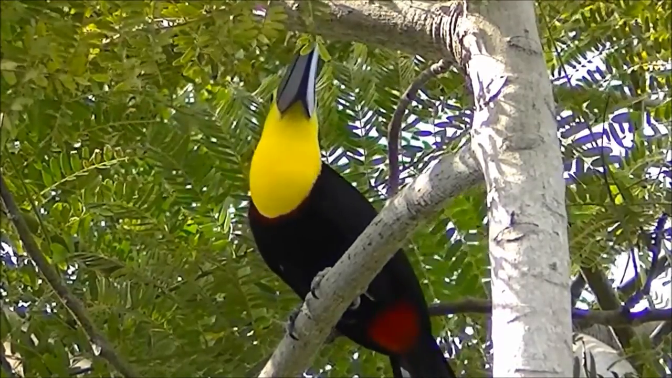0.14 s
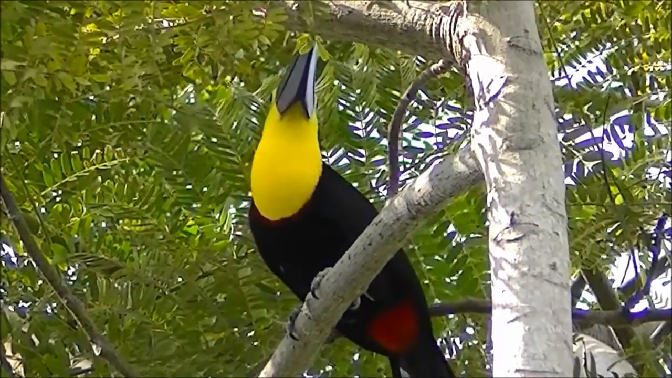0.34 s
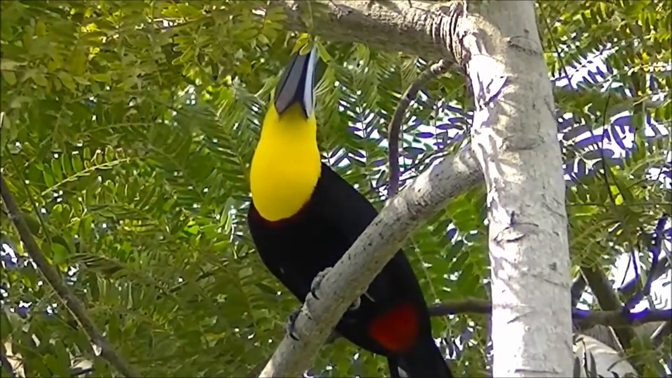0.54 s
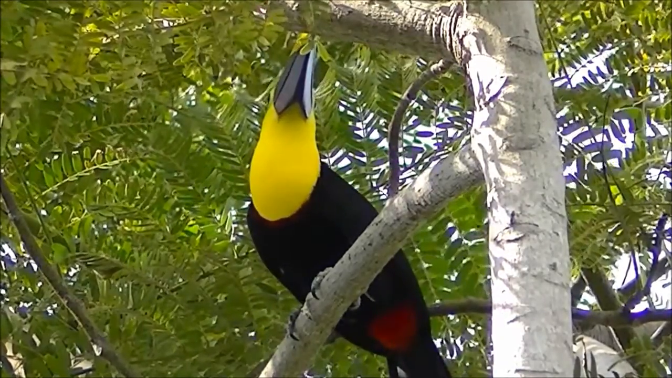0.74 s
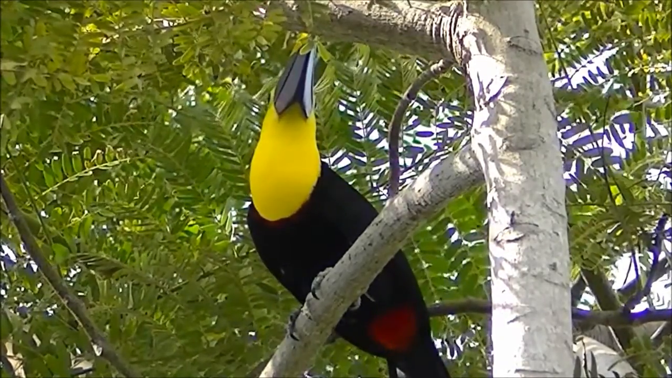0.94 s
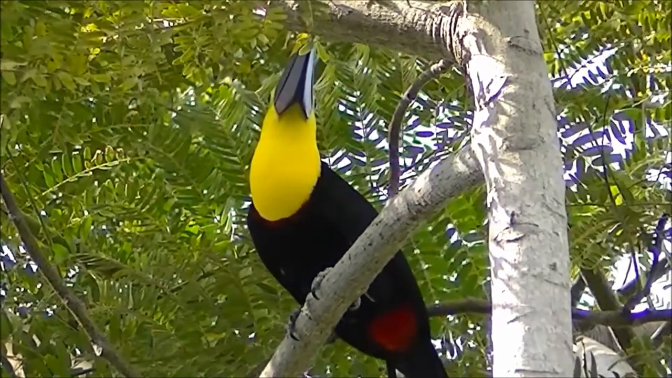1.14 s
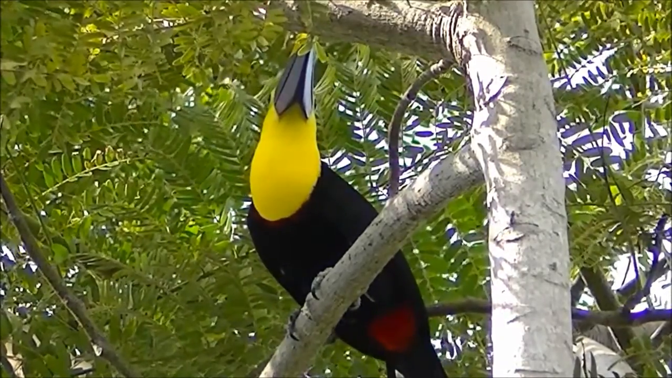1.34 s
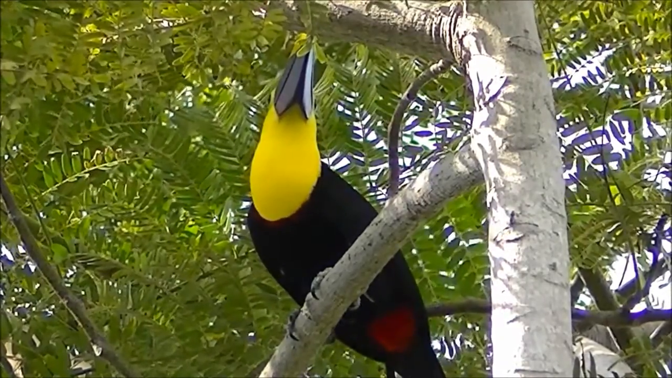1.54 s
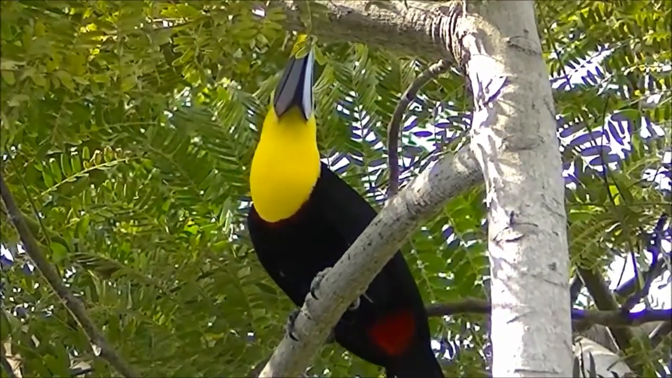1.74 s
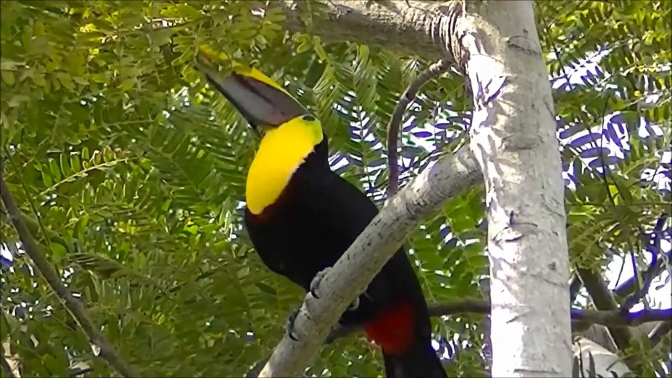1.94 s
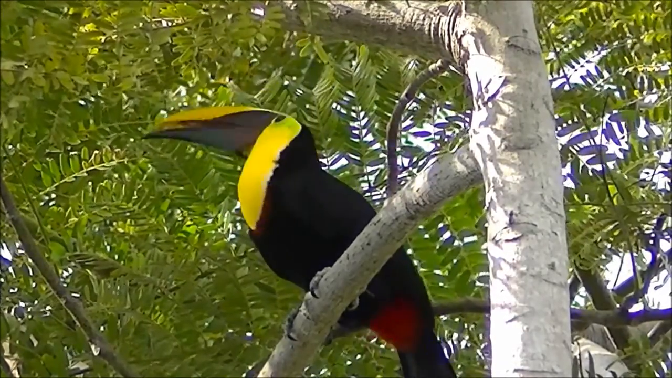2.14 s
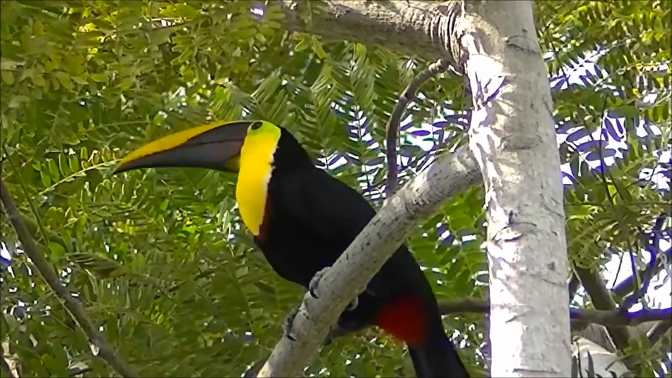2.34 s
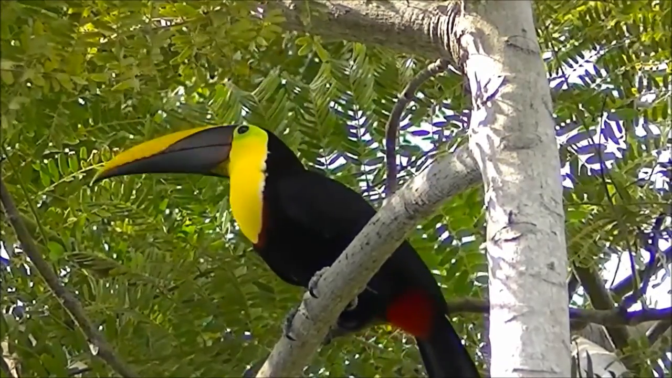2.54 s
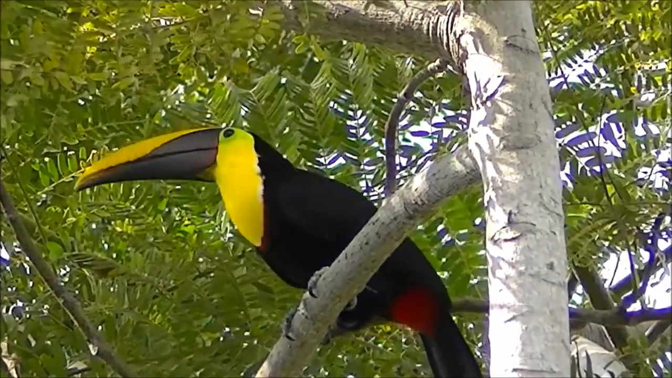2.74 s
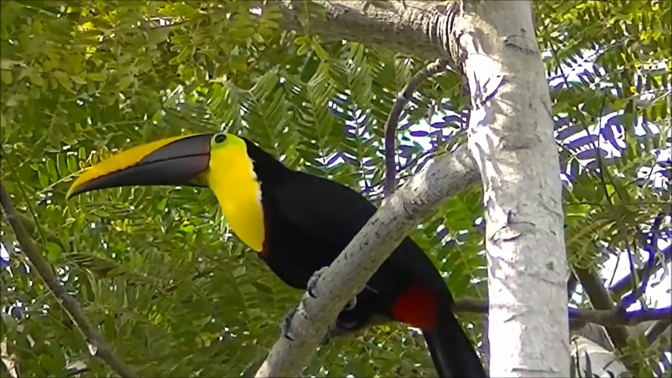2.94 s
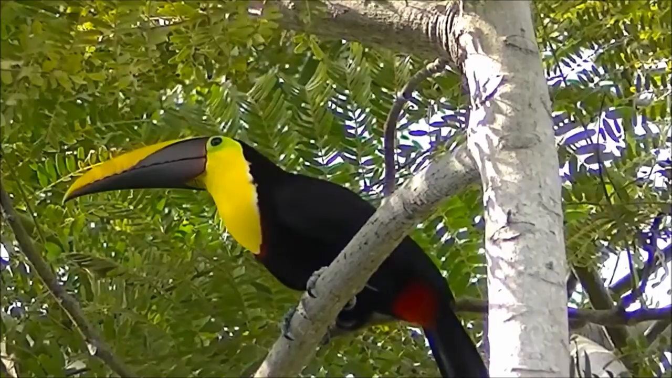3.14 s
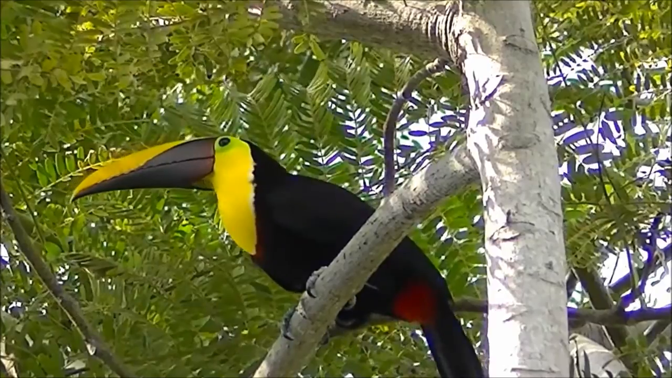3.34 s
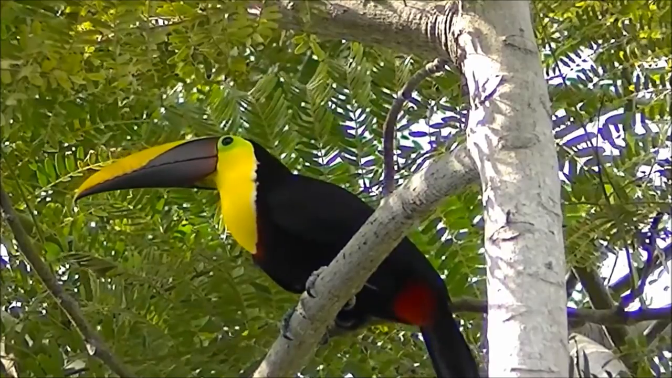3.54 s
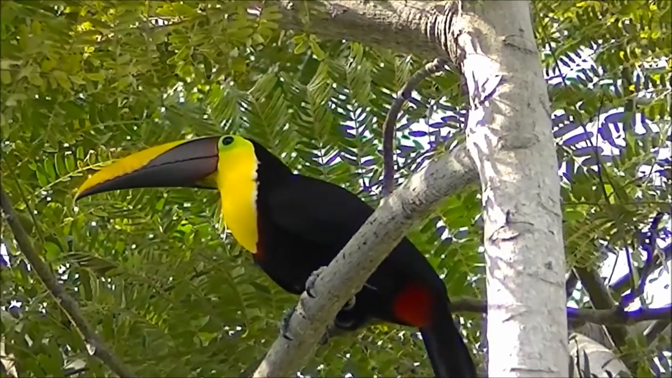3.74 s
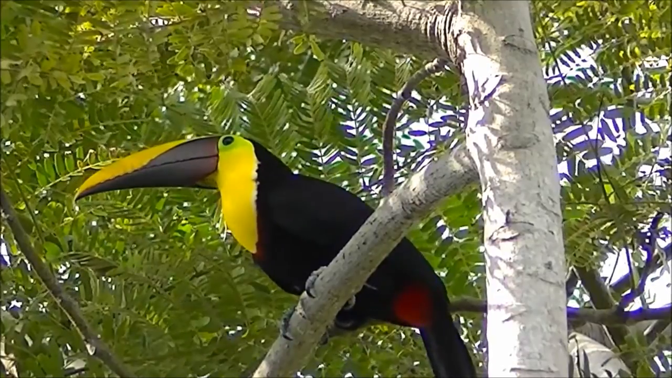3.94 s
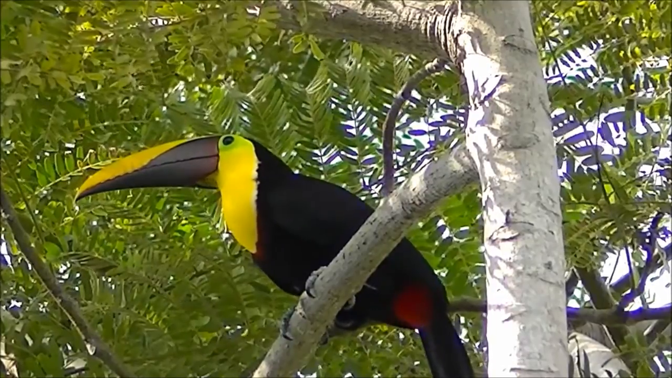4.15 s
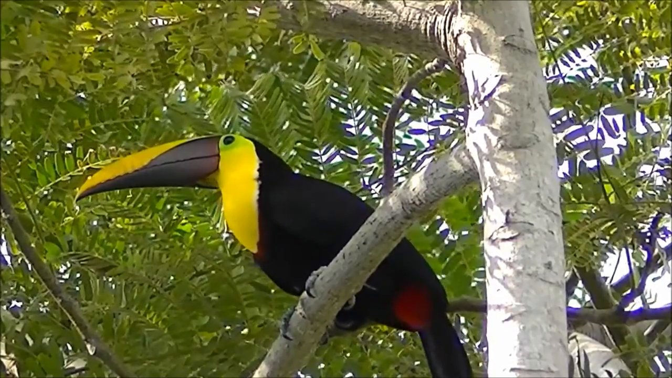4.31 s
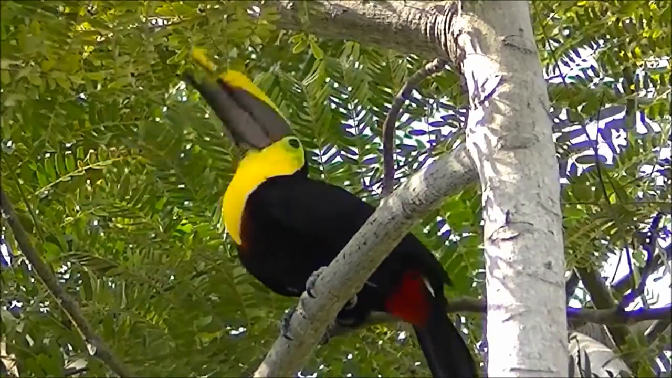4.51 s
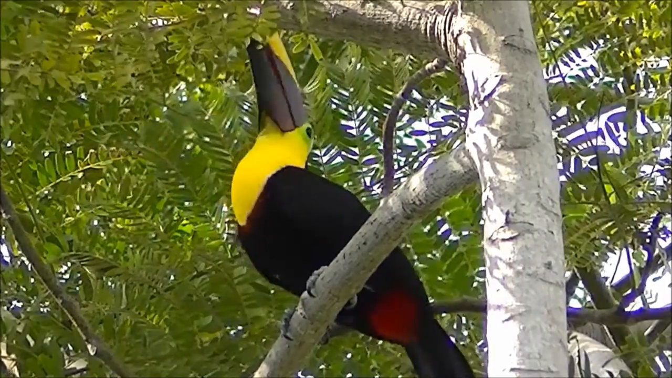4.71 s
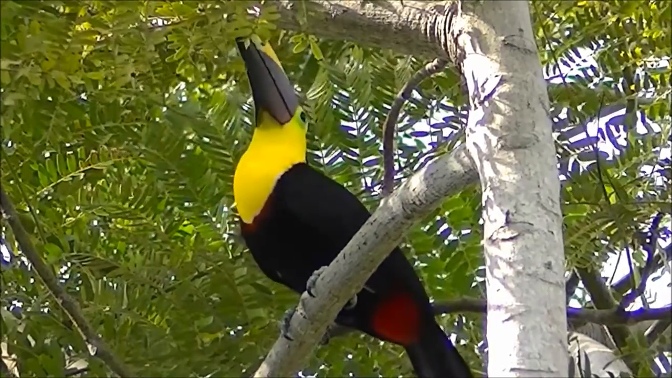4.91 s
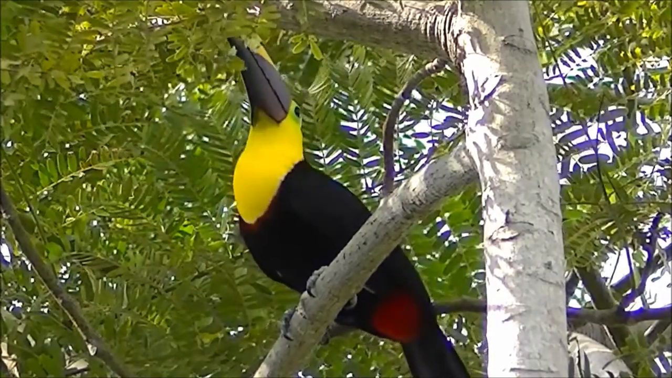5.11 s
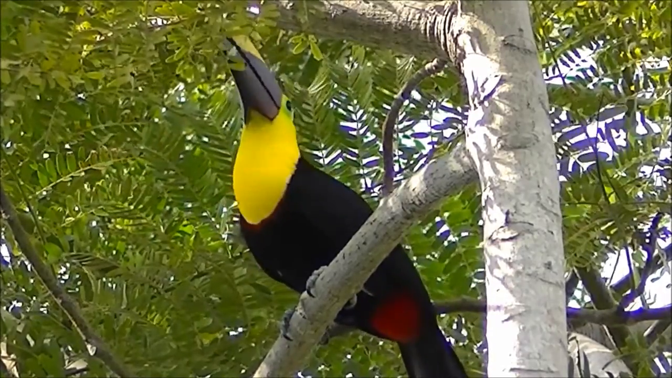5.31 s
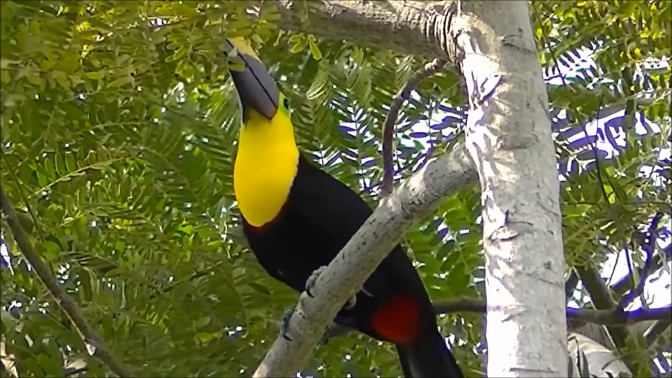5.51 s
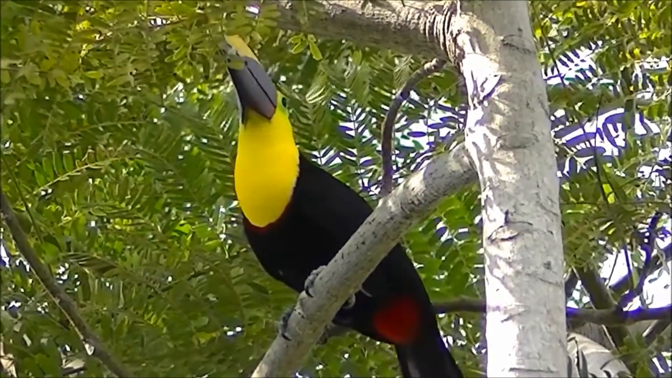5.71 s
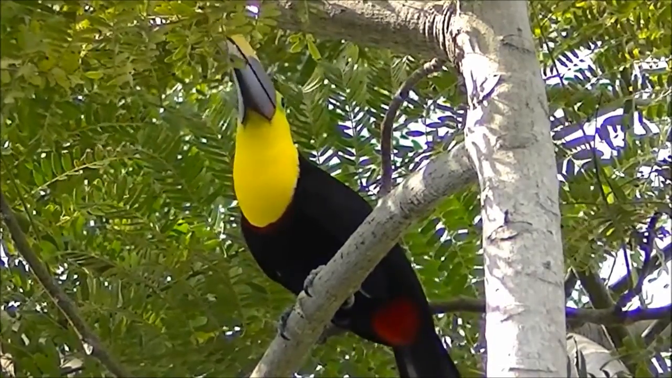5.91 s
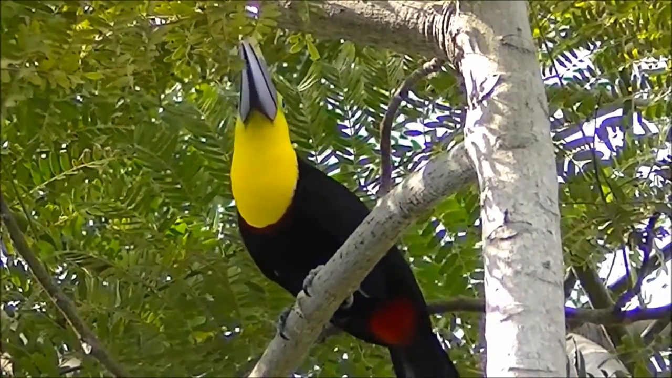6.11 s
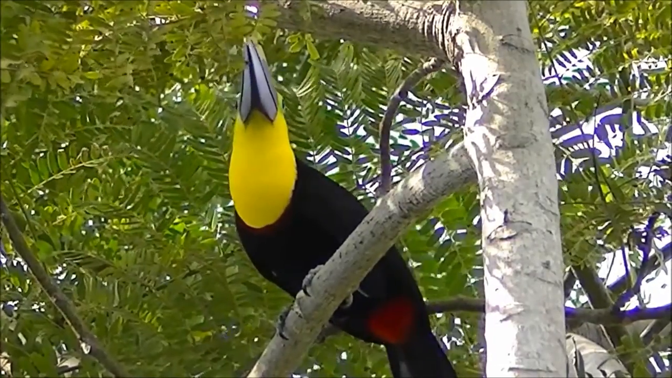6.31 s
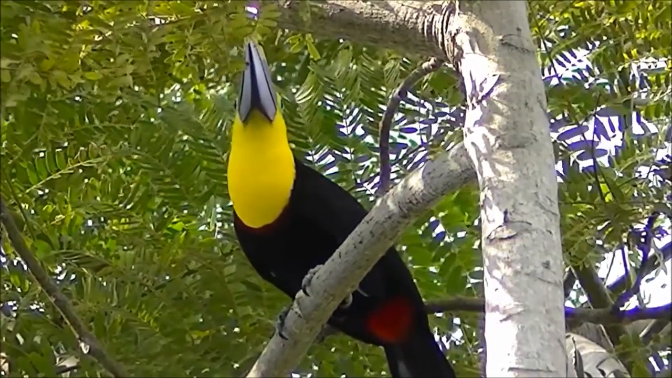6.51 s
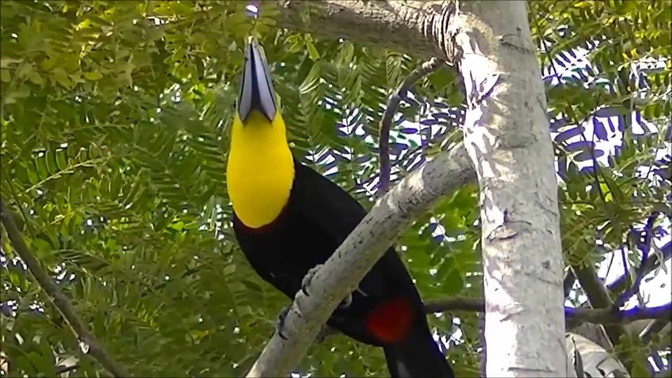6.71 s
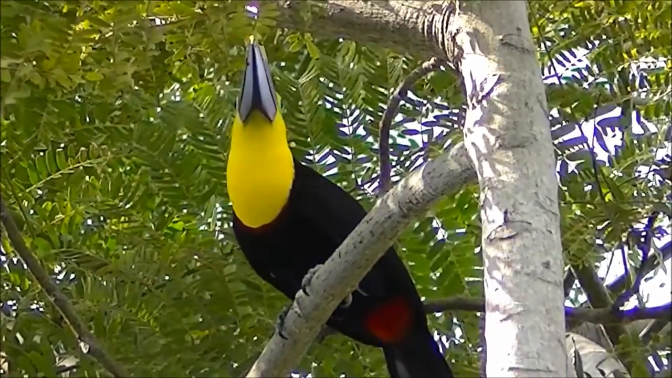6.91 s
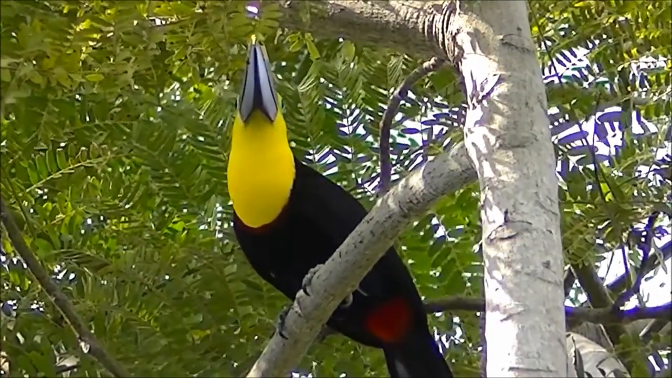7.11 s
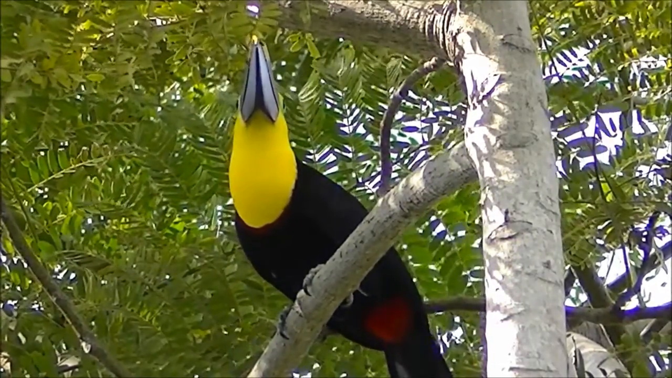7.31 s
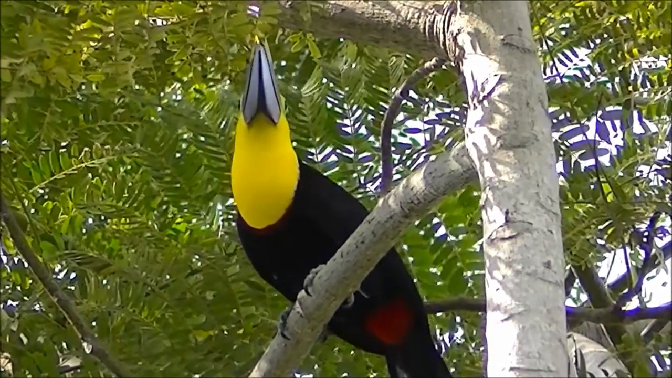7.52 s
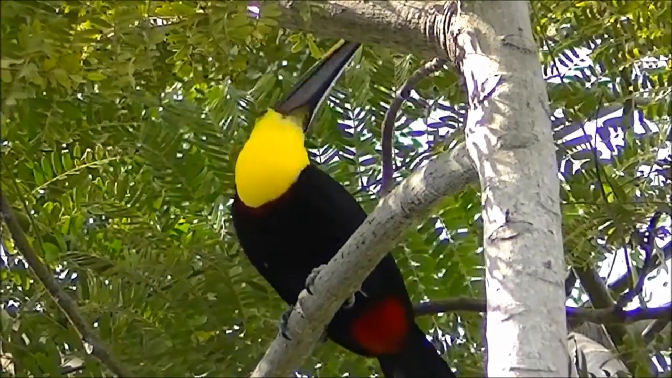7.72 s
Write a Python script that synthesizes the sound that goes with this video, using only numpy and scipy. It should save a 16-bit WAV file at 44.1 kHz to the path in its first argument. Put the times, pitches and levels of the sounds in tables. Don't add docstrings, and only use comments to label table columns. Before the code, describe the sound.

Bright echoing toucan yelps in short uneven phrases, with fainter replies from other trees, tiny bird chips, faint insects and a steady far river-like rumble.

```python
import sys
import numpy as np
from scipy import signal
from scipy.fft import rfft, irfft
from scipy.io import wavfile
from scipy.ndimage import uniform_filter1d

SR = 44100
rng = np.random.default_rng(int(sys.argv[2]) if len(sys.argv) > 2 else 0)


def int16_out(signal):
    q = np.round(np.clip(np.atleast_2d(signal).T, -1, 1) * 32767)
    wavfile.write(sys.argv[1], SR, q.astype(np.int16))


def decibels_to_gain(level_db):
    exponent = np.asarray(level_db, float) / 20
    return 10 ** exponent


N = 346626


def bands(x, lo_hz, hi_hz, order=2):
    edges_hz = [lo_hz, min(hi_hz, .45 * SR)]
    return signal.sosfilt(signal.butter(order, edges_hz, "band", fs=SR, output="sos"), x)


def unit(x):
    return x / np.sqrt(np.mean(x ** 2))


def walk(rate_hz):
    k = int(SR / rate_hz)
    held = np.repeat(rng.standard_normal(N // k + 1), k)
    return 1.46 * uniform_filter1d(uniform_filter1d(held, k), k)[:N]


def sides(x, pan_db):
    return x * decibels_to_gain(np.array([pan_db, -pan_db]) / 2)


def trees(echo_db, t60_s):
    t = np.arange(int(1.3 * SR)) / SR
    grain = rng.standard_normal((2, 3, len(t))) * decibels_to_gain(1.9 * rng.standard_normal(len(t)))
    quick = .5 * grain[:, :1] + 1.2 * grain[:, 1:]
    slow = quick
    branches = quick * decibels_to_gain(8.0 - 60 * t / (0.26 * t60_s))
    trunks = bands(slow, 300, 6900, order=1) * decibels_to_gain(-60 * t / t60_s)
    tail = (branches + trunks) * np.clip((t - .003) / 0.0027, 0, 1)
    tail = tail.sum(axis=1) if tail.shape[1] == 1 else tail
    return decibels_to_gain(echo_db) * tail[:, 0] / np.sqrt(np.mean(np.sum(tail[:, 0] ** 2, axis=-1)))


def echo(voice, echo_db, t60_s):
    return signal.fftconvolve(voice[None], trees(echo_db, t60_s), axes=1)[:, :N]


# (pitch_hz, level_db)
FOREST_COLOUR = [(12, -61), (20, -30), (64, -18), (126, -2.5), (306, -2), (705, -9), (1070, -11.5),
                 (1580, -12.5), (2400, -16.5), (3170, -20), (3540, -19.5), (4810, -25.5), (7730, -29),
                 (13900, -40), (15500, -69)]
# (pitch_hz, likeness 0-1)
LEFT_RIGHT_LIKENESS = [(30, 0.6), (120, 0.64), (300, 0.69), (700, 0.1), (2000, 0.38), (12000, 0.36)]
# (pitch_hz, width_hz, level_db)
INSECT_BANDS = [
    (5490, 420, -2),
    (7610, 520, 0),
    (9980, 750, -5),
]
# (time_s, rumble_db, hiss_db)
FOREST_SWELL = [
    (0, -43, -63),
    (1.5, -42.5, -64),
    (3, -42.5, -60.5),
    (4.4, -40.5, -61.5),
    (5.3, -44.5, -63),
    (6.1, -43, -61),
    (7.86, -43.5, -61),
]


def forest():
    hz = np.maximum(np.fft.rfftfreq(N, 1 / SR), 1)

    def read(table):
        table_hz, value = np.transpose(table)
        return np.interp(np.log(hz), np.log(table_hz), value)

    like = np.clip(read(LEFT_RIGHT_LIKENESS), 0, 1)
    common, left, right = rfft(rng.standard_normal((3, N)), axis=1)
    late = np.exp(-2j * np.pi * hz * 5 / SR)
    shared = np.sqrt(like) * common * np.array([late, 1 + 0 * late])
    separate = np.sqrt(1 - like) * np.array([left, right])
    pair = decibels_to_gain(read(FOREST_COLOUR)) * (shared + separate)
    scale = np.sqrt(np.mean(irfft(pair, N) ** 2))

    time_s, *columns = np.transpose(FOREST_SWELL)
    rumble_db, hiss_db = (np.interp(np.arange(N) / SR, time_s, c) for c in columns)
    share = 1 / (1 + (hz / 3500) ** 2)
    rumble = irfft(pair * np.sqrt(share), N) / scale * decibels_to_gain(rumble_db + 1.0 + .5 * walk(3))
    hiss = irfft(pair * np.sqrt(1 - share), N) / scale * decibels_to_gain(hiss_db + 19.5)

    insects = np.zeros((2, N))
    for pitch_hz, width_hz, db in INSECT_BANDS:
        noise = rng.standard_normal((2, N))
        choir = unit(bands(noise, pitch_hz - width_hz / 2, pitch_hz + width_hz / 2))
        insects += decibels_to_gain(db + 0.51 * walk(7.2)) * choir
    insects *= decibels_to_gain(-66 + .5 * (hiss_db + 70))
    return (rumble + hiss + insects) * decibels_to_gain(np.array([[.5], [-.5]]) * -3.3)


# (pitch_hz, width_hz, level_db, t60_s)
EARLIER_YELP = [
    (1590, 110, -40, 1.3),
    (3160, 190, -42, 0.9),
    (4750, 300, -54, .8),
]


def earlier_echo():
    t = np.arange(N) / SR
    noise = rng.standard_normal((2, N))
    out = np.zeros((2, N))
    for pitch_hz, width_hz, db, t60_s in EARLIER_YELP:
        ring = unit(bands(noise, pitch_hz - width_hz / 2, pitch_hz + width_hz / 2))
        out += decibels_to_gain(db - 60 * t / t60_s) * ring
    return out


# (start_s, start_pitch_hz, end_pitch_hz, length_s, level_db)
SMALL_BIRD = [
    (.292, 7500, 9600, .035, -58),
    (.99, 3620, 3580, .12, -64),
    (1.245, 6800, 9000, .03, -57),
    (4.26, 7600, 9200, .03, -59),
    (5.862, 7600, 8900, .025, -58),
    (6.366, 7000, 9000, .028, -57),
    (7.12, 7200, 9000, .03, -60),
]


def chips():
    out = np.zeros(N + SR)
    flutter = decibels_to_gain(2.5 * walk(400))
    for start_s, from_hz, to_hz, length_s, db in SMALL_BIRD:
        n, i = int(length_s * SR), int(start_s * SR)
        sweep = np.sin(2 * np.pi * np.cumsum(np.linspace(from_hz, to_hz, n)) / SR)
        out[i:i + n] += decibels_to_gain(db) * sweep * np.hanning(n) ** .4 * flutter[i:i + n]
    return out[:N] + echo(out, 2.5, .3)


SHAPES = { "kee": ([(0, .35, -15, 0), (.12, .15, 0, 4), (.35, 0, 0, 5), (.66, .17, 2.5, -5),
          (.97, .8, 3, -12)], (-3, -24, -24)), "hold": ([(0, 0, -3.5, -4), (.25, .12, -.7, -8),
          (.5, .25, .7, 1.5), (.66, .35, -11, 11), (.82, .6, -3, 3), (.97, 1, -4, 4)], (-14, -28, -46)),
          "sag": ([(0, 0, -15, 0), (.13, .15, 0, 0), (.4, .4, -6, 5), (.7, .75, -6, 4), (.97, 1, -6, 0)],
          (-3, -14, -35)), "swell": ([(0, 0, -25, -8), (.2, .1, -6, -10), (.48, .25, 0, 3),
          (.75, .55, -7, 0), (.97, 1, -7, 5)], (-3, -14, -30)), }
ENDINGS = { "yip": ([(0, .3, -8, 0), (.25, 0, 0, -3), (.55, .15, -3, 2.5), (.75, .45, -7, 3.5),
           (.97, 1, -22, 0)], (-7, -21, -38)), "cluck": ([(0, 0, -12, 0), (.12, .1, 0, 0),
           (.45, .25, -2.5, 2.5), (.7, .6, -4, 0), (.97, 1, -16, -3)], (-4, -13, -28)), }
# (whistle, overtone 2, overtone 3, overtone 5), db per db
BEAK_SHARE = (-.6, .8, .7, .7)


def controls(yelp):
    (end_s, second_db, upper_db, pan_db), syllables = yelp
    stops_s = [syllable[1] for syllable in syllables[1:]] + [end_s]
    rows = []
    for (name, start_s, top_hz, bottom_hz, db, gape_db), stop_s in zip(syllables, stops_s):
        shape, tones = {**SHAPES, **ENDINGS}[name]
        aim = [0, tones[0] + second_db, tones[1] + upper_db / 2, tones[2] + upper_db]
        for at, fall, effort_db, opening_db in shape:
            levels = db + effort_db + (opening_db + gape_db) * np.array(BEAK_SHARE) + aim
            time_s = start_s + np.clip(at, 0, .99) * (stop_s - start_s)
            rows.append((time_s, top_hz + fall * (bottom_hz - top_hz), *levels, pan_db))
    return rows


def toucan(yelps, echo_db, t60_s, dull_db, lag, croak=()):
    t = np.arange(N) / SR
    notes = [controls(yelp) for yelp in yelps]
    time_s, *columns = np.concatenate(notes).T
    smooth = [uniform_filter1d(np.interp(t, time_s, c), size=200) for c in columns]
    hz, db1, db2, db3, db5, pan_db = smooth

    breath, hoarse = np.zeros(N), np.zeros(N)
    for note, (_, syllables) in zip(notes, yelps):
        start_s, end_s = note[0][0], note[-1][0]
        breath += (t >= start_s) & (t < end_s)
        if syllables[-1][0] in ENDINGS:
            hoarse += .45 * np.clip((t - end_s + .038) / .015, 0, 1) * (t < end_s + .01)
    breath = uniform_filter1d(breath, size=90, origin=44)
    phase = 2 * np.pi * np.cumsum(hz * (1 + .002 * walk(150))) / SR + (.03 + hoarse) * walk(400)

    db3, db5 = db3 + dull_db / 2, db5 + dull_db
    levels = [db1, db2, db3, (db3 + db5) / 2 - 2, db5, db5 - 13, db5 - 27, db5 - 35]
    voice = np.zeros(N)
    for k, db in enumerate(levels):
        flutter_db = min(1.4 + .9 * k, 4) * walk(60)
        voice += decibels_to_gain(db + flutter_db) * np.sin((k + 1) * phase + k)
    for half, start_s, end_s, db in croak:
        gate = uniform_filter1d(1. * (t > start_s) * (t < end_s), size=400)
        voice += decibels_to_gain(db1 + db) * np.sin(round(half) * phase / 2) * gate
    voice = np.sqrt(2) * decibels_to_gain(-0.5) * voice * breath

    direct = sides(voice, pan_db)
    direct[0] = np.roll(direct[0], lag)
    return direct + echo(voice, echo_db, t60_s)


# ((end_s, overtone_2_db, upper_overtones_db by aim of the beak, left_minus_right_db),
# syllables (shape, start_s, top_pitch_hz, bottom_pitch_hz, level_db, extra_gape_db))
NEAR_YELPS = [
    ((2.05, 0, 2, -2.5), [("kee", 1.902, 1875, 1660, -24.5, 3.5), ("hold", 1.972, 1660, 1625, -20.5, -5)]),
    ((2.84, 1.5, -3, -1.5), [("sag", 2.66, 1700, 1530, -25, 2.5), ("yip", 2.735, 1687, 1306, -19, 3)]),
    ((4.83, -.7, -2.5, -1.5), [("kee", 4.497, 1919, 1640, -26, -1.5), ("hold", 4.57, 1650, 1580, -14.5, 2.5), ("yip", 4.74, 1678, 1320, -14, -1.5)]),
    ((5.415, 1.5, 5, -1.5), [("sag", 5.225, 1720, 1488, -22, 0), ("yip", 5.305, 1668, 1314, -19, 0)]),
    ((5.99, 0, 0, -1.5), [("cluck", 5.888, 1690, 1292, -23, 0)]),
    ((6.097, -3, 1.5, -1.5), [("cluck", 6.063, 1570, 1330, -26.5, 3)]),
    ((7.935, 1.5, 3, -2.5), [("kee", 7.581, 1860, 1660, -23.5, 0), ("hold", 7.653, 1670, 1516, -18.5, 2.5), ("yip", 7.795, 1663, 1320, -15, -1.5)]),
]


def near_toucan():
    croak = [(5, 1.905, 1.96, -37)]
    return toucan(NEAR_YELPS, echo_db=-1.46, t60_s=0.76, dull_db=-0.12, lag=-1, croak=croak)


MATE_YELPS = [
    ((2.255, -6, -10, .4), [("swell", 1.995, 2125, 1993, -22, 0), ("yip", 2.15, 2190, 1865, -22, 1.5)]),
]
# (multiple of half pitch, start_s, end_s, level_db re whistle)
MATE_CROAK = [
    (1, 1.9, 2.1, -25.5),
    (1, 2.19, 2, -26),
    (3, 2.03, 2.25, -27),
    (5, 1.7, 2.2, -30.5),
    (7, 2.04, 2.2, -44),
]


def mate_toucan():
    return toucan(MATE_YELPS, echo_db=-1.6, t60_s=0.94, dull_db=1, lag=-2, croak=MATE_CROAK)


# (start_s, length_s, level_db, low_edge_hz)
AIR_PUFFS = [(2.56, 0.021, -74, 9000), (2.625, 0.04, -64, 5920), (2.8, .035, -50, 6030),
             (2.835, 0.051, -50, 9000), (4.0, .05, -70, 7300), (4.51, 0.055, -63, 9000),
             (4.64, .15, -53.5, 9000), (4.79, 0.036, -60, 3990), (5.24, .12, -56.5, 10000),
             (5.37, .05, -56, 3970), (5.9, 0.047, -65.5, 9020), (6.0, .06, -53.5, 5970),
             (6.06, 0.041, -50.5, 3096), (6.13, .2, -64, 9040), (7.59, .06, -66, 9100),
             (7.8, .05, -56.5, 9050)]


def puffs():
    out, noise = np.zeros((2, N)), rng.standard_normal((2, N))
    for start_s, length_s, db, low_hz in AIR_PUFFS:
        part = slice(int(start_s * SR), min(int((start_s + length_s) * SR), N))
        burst = bands(noise[:, part], low_hz, 14500, order=1)
        out[:, part] += decibels_to_gain(db) * np.hanning(part.stop - part.start) * burst
    return out * decibels_to_gain(2.5 * walk(150))


FAR_YELPS = [
    ((3.39, -7, -16, -5), [("kee", 2.965, 1780, 1505, -34.5, 0), ("hold", 3.04, 1515, 1430, -32.5, 0), ("yip", 3.245, 1630, 1400, -33, 0)]),
    ((3.915, -12, -16, -3), [("sag", 3.696, 1670, 1510, -33.5, -3), ("yip", 3.785, 1560, 1360, -31, 0)]),
    ((4.0, -7, -22, -3), [("cluck", 3.955, 1985, 1600, -36, 0)]),
]


def far_toucan():
    return toucan(FAR_YELPS, echo_db=-0.53, t60_s=1, dull_db=-10, lag=2)


def scene():
    birds = near_toucan() + mate_toucan() + far_toucan()
    calls = decibels_to_gain(3.8) * (birds + earlier_echo())
    return forest() + calls + decibels_to_gain(2.5) * chips() + decibels_to_gain(4.2) * puffs()


def follow(want, start, attack, release):
    out = [start]
    for w in want:
        speed = attack if w < out[-1] else release
        out.append(out[-1] + (w - out[-1]) * min(speed, 1))
    return out[1:]


def top_cut(x):
    return signal.sosfilt(signal.butter(12, 15660, fs=SR, output="sos"), x)


def record(dry):
    step = SR // 100
    start_db, ratio, attack_s, release_s = -30, 1.45, .09, 1.2
    power = uniform_filter1d(np.mean(dry ** 2, axis=0), size=step)[::step]
    loud_db = 10 * np.log10(power + 1e-12)
    want_db = -np.maximum(loud_db - start_db, 0) * (1 - 1 / ratio)
    gain_db = follow(want_db, -5.5, step / (attack_s * SR), step / (release_s * SR))
    gain_db = np.interp(np.arange(N) / step, np.arange(len(gain_db)), gain_db)
    return top_cut(dry * decibels_to_gain(gain_db))


dry = scene()
out = record(dry)
int16_out(out)
```